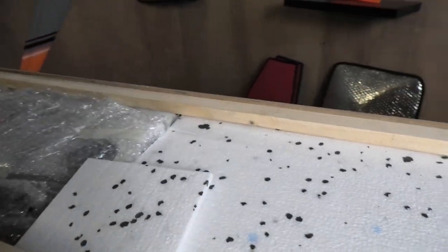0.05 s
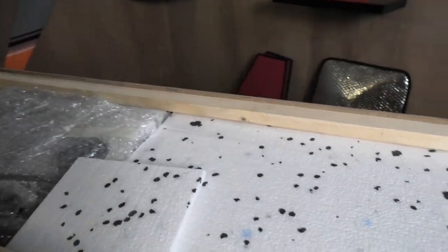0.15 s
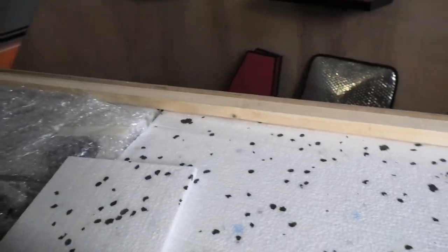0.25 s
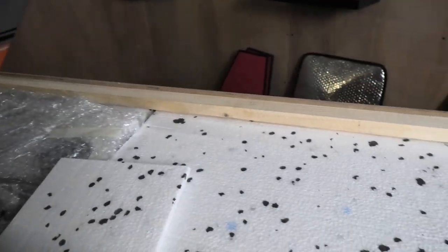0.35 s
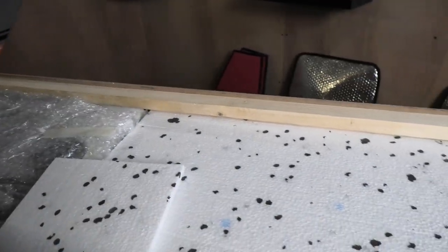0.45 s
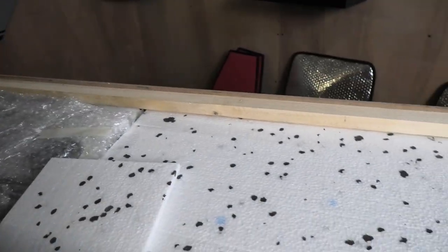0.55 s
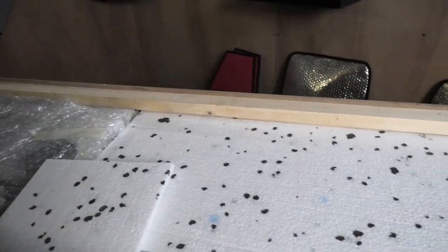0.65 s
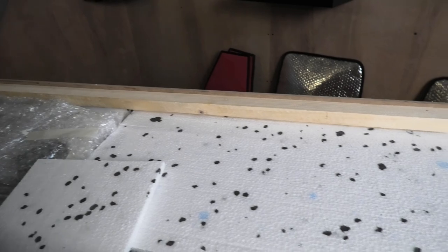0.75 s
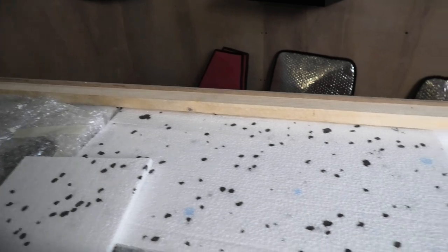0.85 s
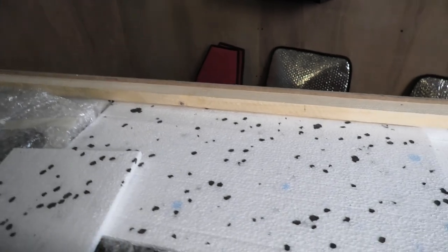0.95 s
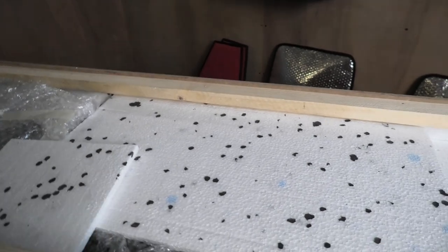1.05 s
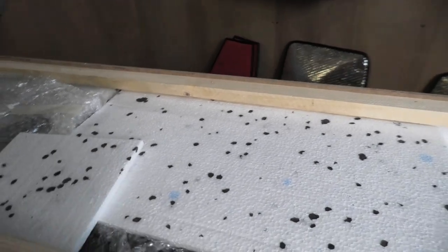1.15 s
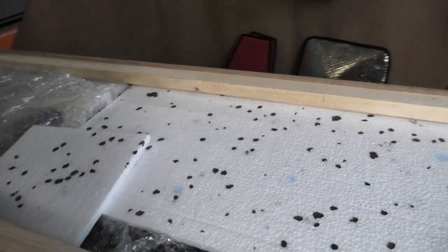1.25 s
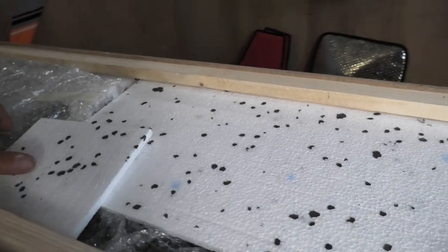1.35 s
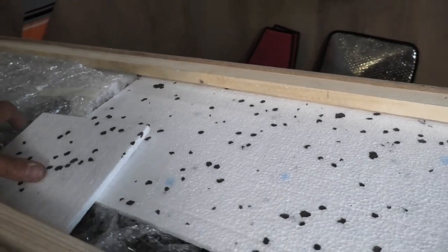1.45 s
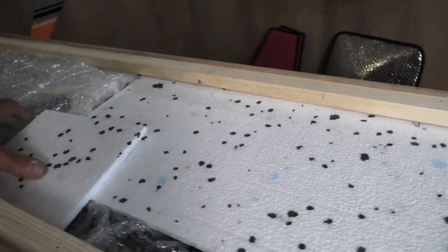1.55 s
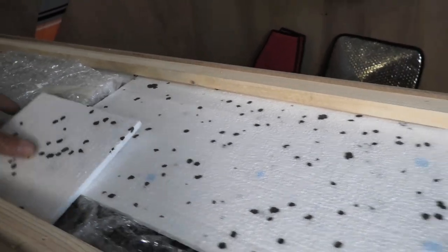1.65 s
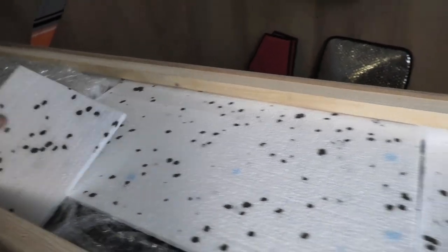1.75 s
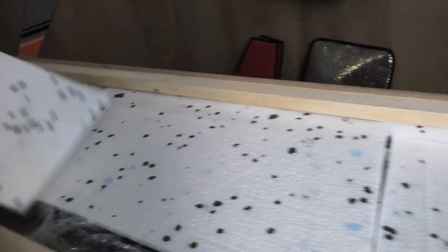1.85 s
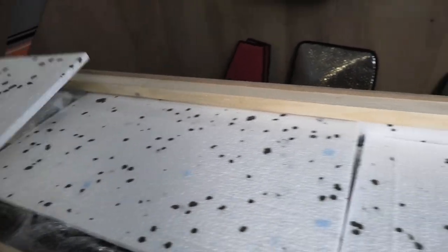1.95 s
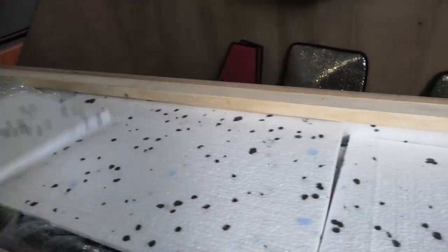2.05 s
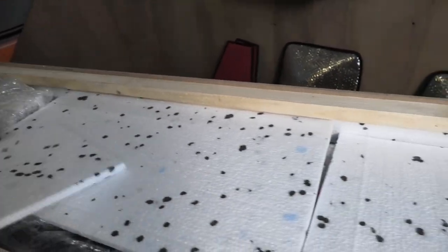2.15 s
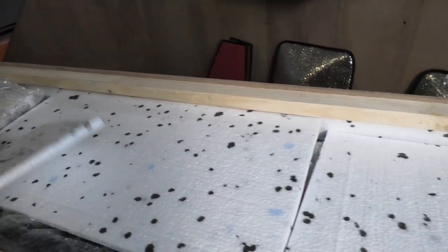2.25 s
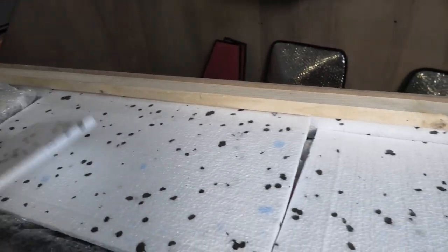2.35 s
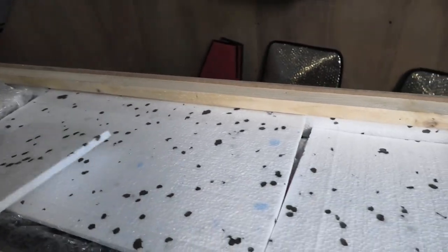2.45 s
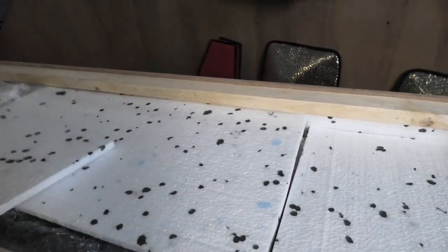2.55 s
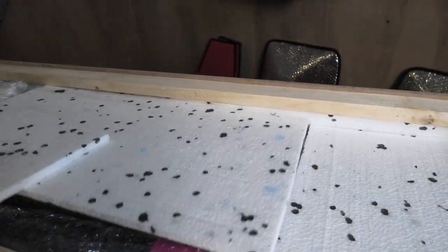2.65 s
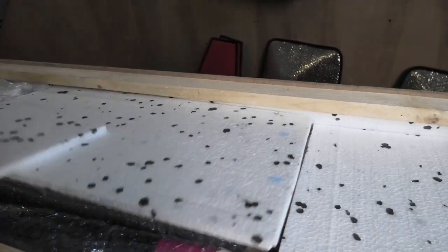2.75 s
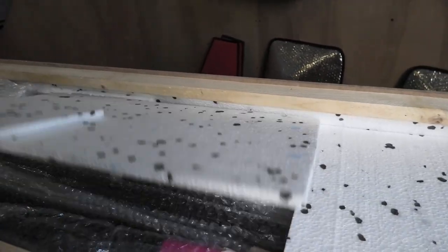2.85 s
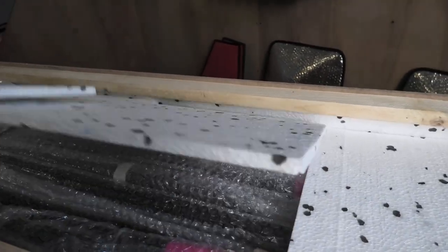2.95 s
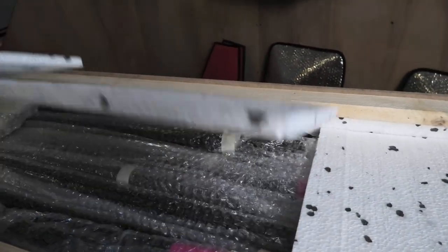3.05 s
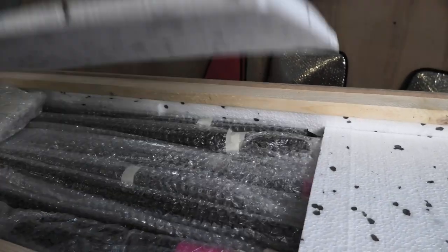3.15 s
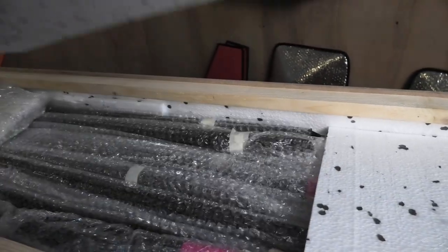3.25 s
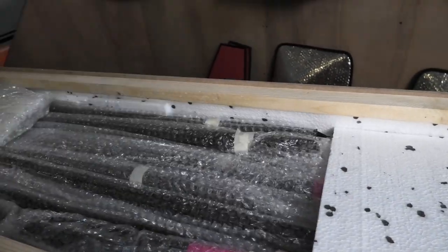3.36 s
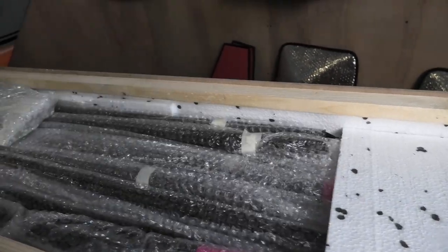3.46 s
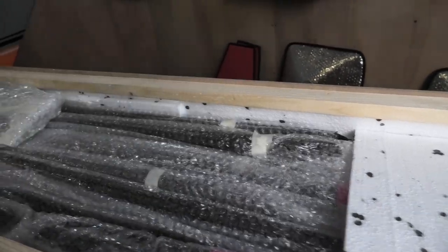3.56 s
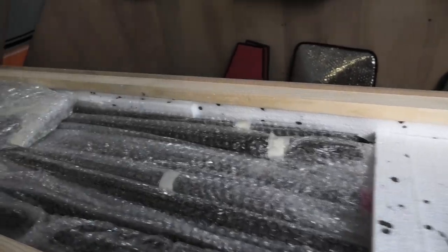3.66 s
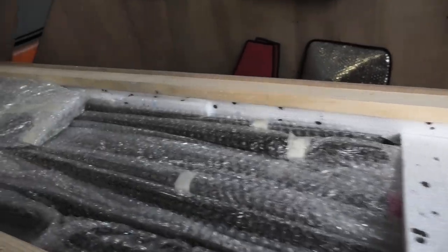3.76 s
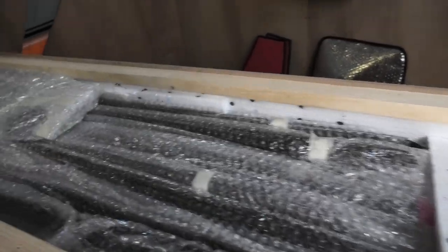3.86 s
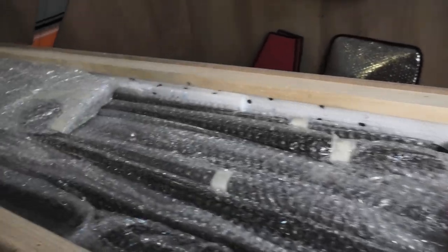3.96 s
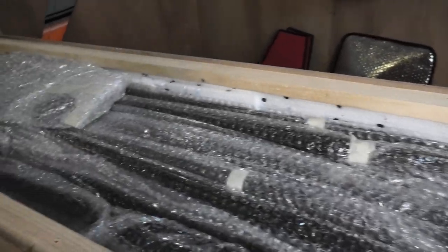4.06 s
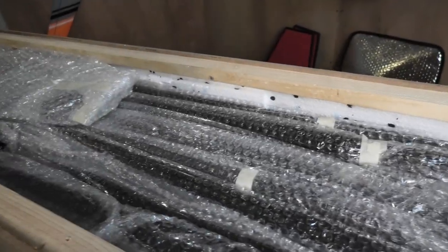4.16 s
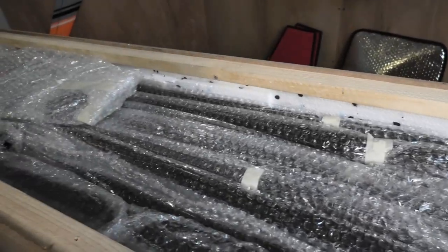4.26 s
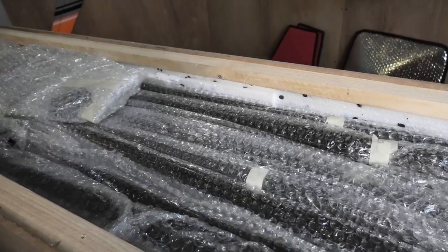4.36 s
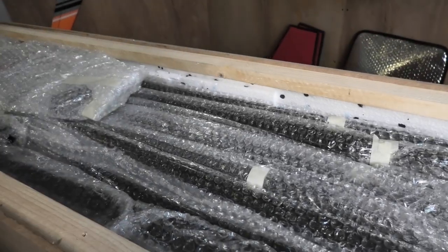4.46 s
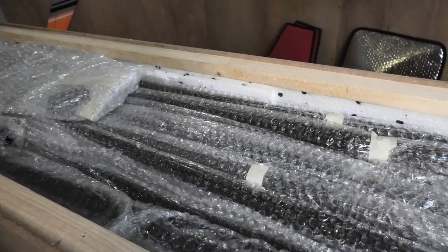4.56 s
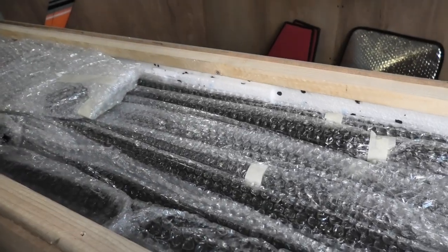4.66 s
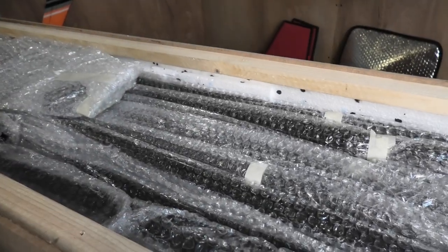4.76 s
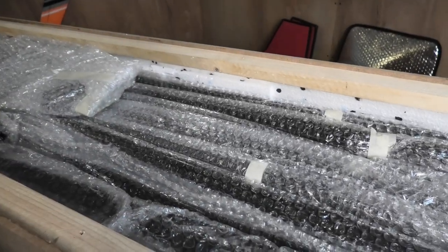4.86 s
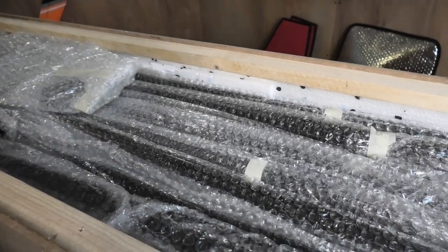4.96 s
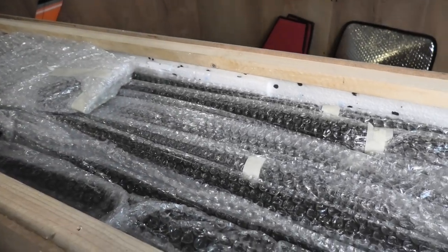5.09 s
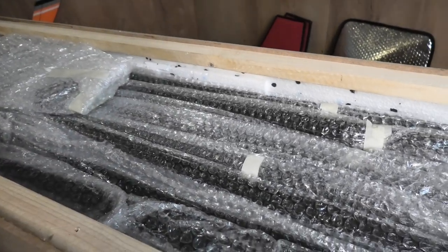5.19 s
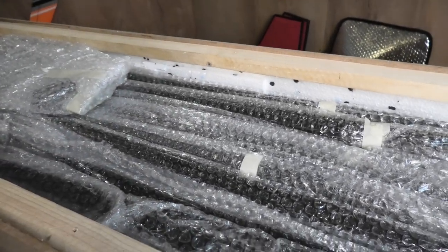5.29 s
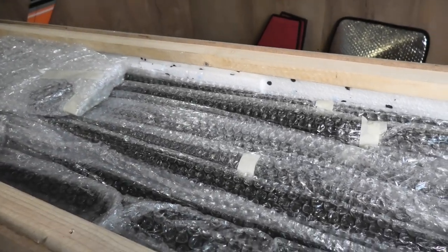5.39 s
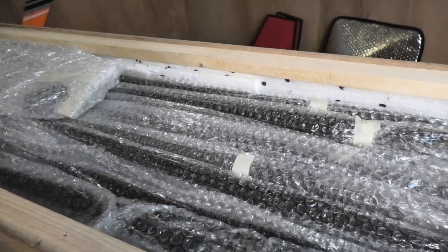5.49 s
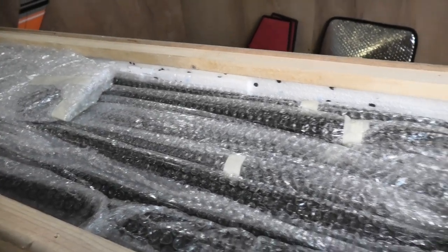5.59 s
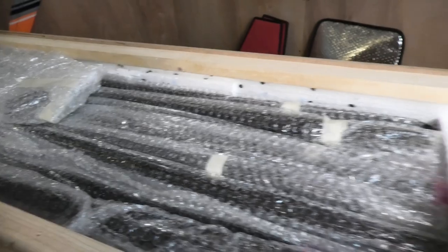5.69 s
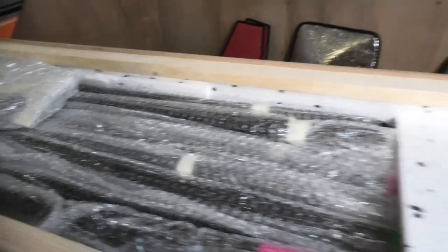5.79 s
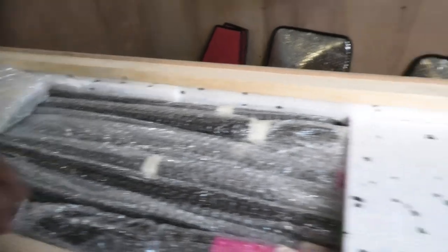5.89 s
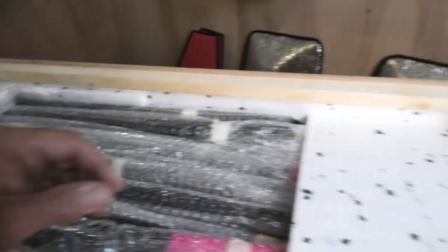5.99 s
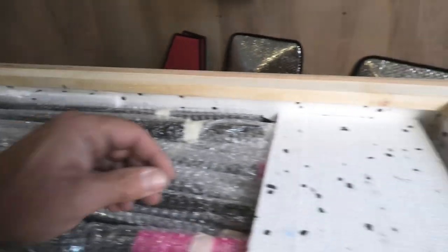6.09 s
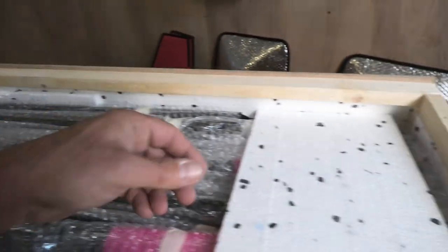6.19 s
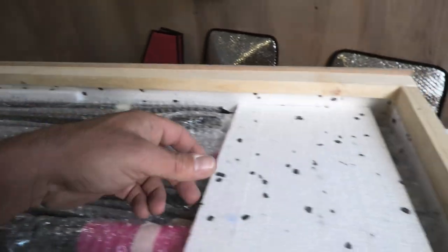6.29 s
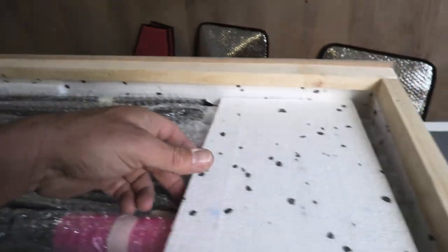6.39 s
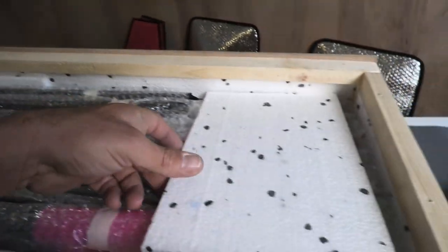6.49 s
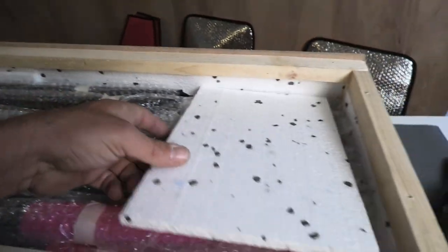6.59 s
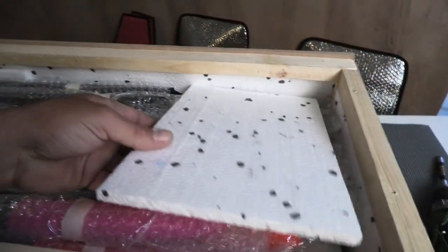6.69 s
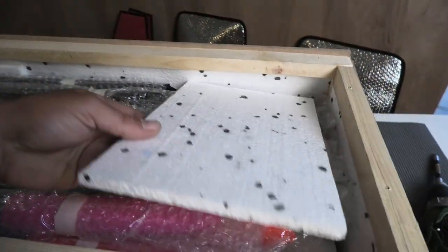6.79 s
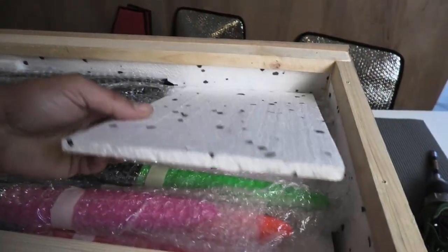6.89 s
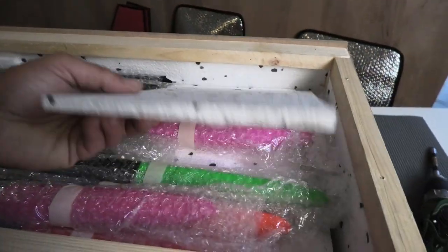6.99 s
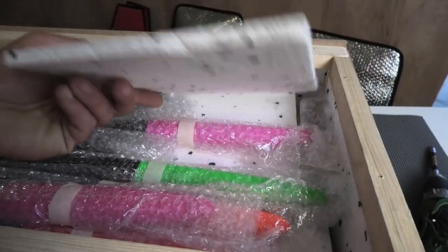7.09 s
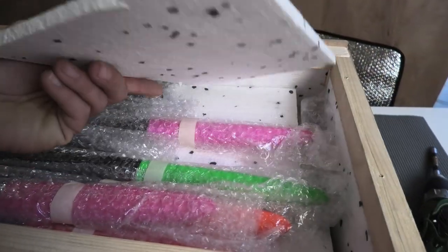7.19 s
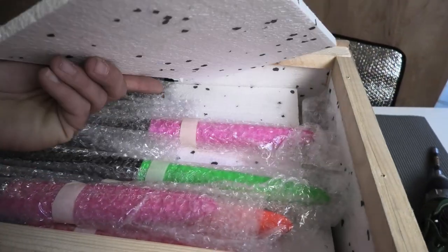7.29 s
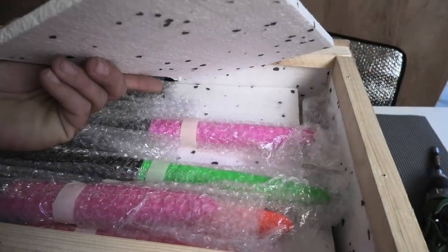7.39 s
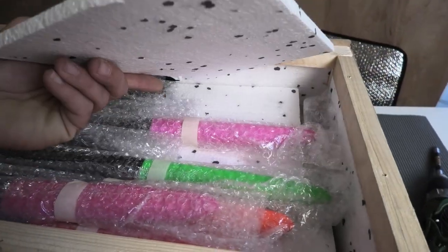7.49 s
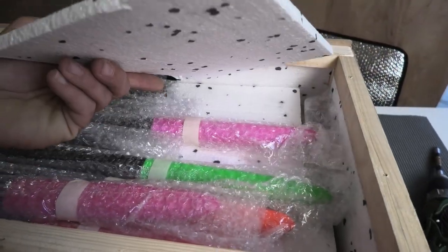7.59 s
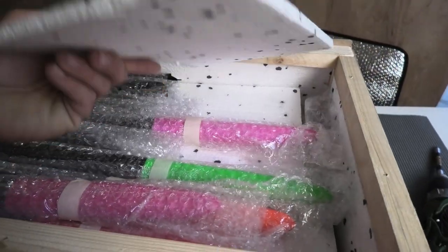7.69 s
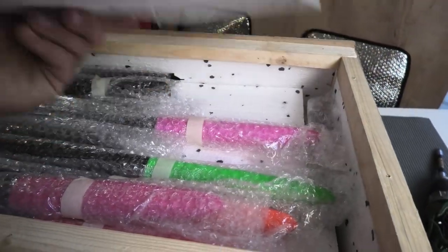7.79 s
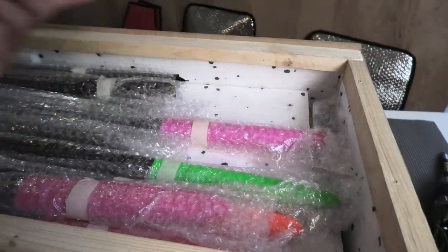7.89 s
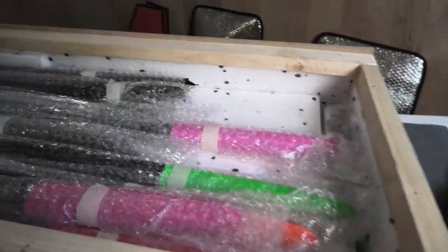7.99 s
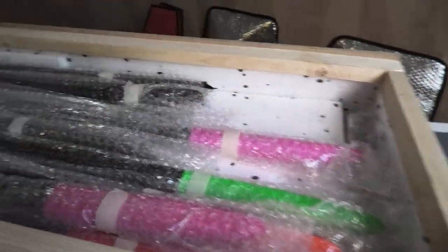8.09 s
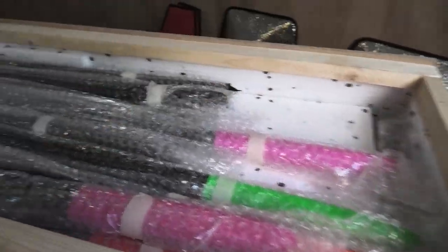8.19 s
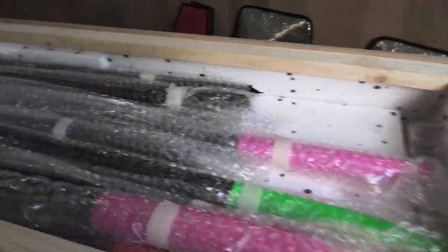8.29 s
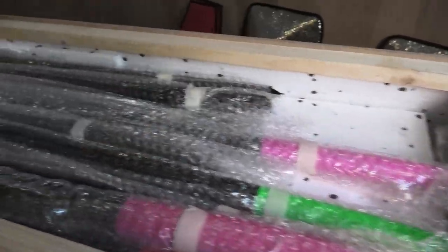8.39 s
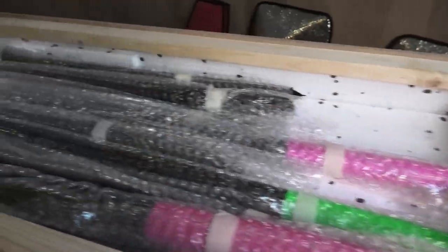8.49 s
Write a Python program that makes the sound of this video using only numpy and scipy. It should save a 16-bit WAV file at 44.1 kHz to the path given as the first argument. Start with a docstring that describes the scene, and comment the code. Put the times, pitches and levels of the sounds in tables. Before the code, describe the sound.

Light foam packing sheets scrape, squeak and crackle against each other and a wooden crate, with dull knocks and sharp snaps in a small quiet room.

```python
"""Foam sheets pulled from a crate

Polystyrene packing sheets are pulled by hand out of a wooden crate in a small room and put aside.
Their beads catch and slip thousands of times a second: random clicks, coloured by the rubbing sheet's
resonances, make a bright hiss. Snapping edges are short noise bursts; hollow thuds and crate knocks are
dying sine waves; a brief squeak is one unsteady tone. Echoes, a quiet background and a late rumble join in."""
import sys
import numpy as np
from scipy import signal
from scipy.fft import rfft, irfft
from scipy.io import wavfile

SR = 44100
rng = np.random.default_rng(int(sys.argv[2]) if len(sys.argv) > 2 else 0)


def master(y):
    """Save y as 16-bit WAV."""
    cut = np.clip(np.atleast_2d(y).T, -1, 1)
    pcm = np.round(cut * 32767)  # scale
    wavfile.write(sys.argv[1], SR, pcm.astype(np.int16))


N = 376613
TIME = np.arange(N) / SR  # seconds
FREQ = np.maximum(np.fft.rfftfreq(4096, 1 / SR), 1)  # Hz; the lowest is raised to 1 so its log exists


def undb(db):
    """Turn decibels into gain."""
    return 10 ** (np.asarray(db) / 20)


def unit(x):
    """Scale to an rms (average strength) of 1."""
    return x / np.sqrt(np.mean(x ** 2))


def contour(points):
    """Join (Hz, value) points by straight lines on a log-frequency axis."""
    hz, value = np.transpose(points)
    return np.interp(np.log(FREQ), np.log(hz), value)


def convolve(x, response):
    """Pass sound through a response, keeping its length."""
    return signal.fftconvolve(np.atleast_2d(x), np.atleast_2d(response), axes=-1)[:, :x.shape[-1]]


def colour(x, db):
    """Filter with the given dB at each of FREQ, without sounding before its input."""
    cepstrum = irfft(np.log(undb(db)))
    # folding the cepstrum forward gives the minimum-phase response
    cepstrum[1:len(FREQ) - 1] *= 2
    cepstrum[len(FREQ):] = 0
    return convolve(x, irfft(np.exp(rfft(cepstrum))))


def band(x, hz, kind):
    """Keep one range of frequencies with a Butterworth filter."""
    return signal.sosfilt(signal.butter(4, hz, kind, fs=SR, output="sos"), x)


def wander(t, rate):
    """Random drift with a spread near 1, heading for a new value `rate` times a second."""
    knots = np.arange(t[0], t[-1] + 1 / rate, 1 / rate)
    values = rng.standard_normal(len(t))[:len(knots)]
    return np.interp(t, knots, values)


def echoes(t60, delay):
    """Dense reflections of unit energy that start after a delay and fall 60 dB in t60 seconds."""
    t = TIME[:int(t60 * SR)]
    tail = rng.standard_normal(len(t)) * undb(-60 * t / t60) * (t > delay)
    return tail / np.sqrt(np.sum(tail ** 2))


# Stereo width by frequency: how much independent left-minus-right sound is added, almost none near 8 kHz.
# Each row: frequency in Hz, dB added to the source's width.
WIDTH = [(150, -5), (600, 0.5), (2000, -2), (4200, 1.5), (6200, -18.5), (8000, -48), (10000, 0.5),
         (15000, -2)]
# Left-right level difference by frequency, almost none near 5-8 kHz.
# Each row: frequency in Hz, share of the sideways position's dB (a negative share favours the far side).
PAN_SHARE = [(300, -0.39), (700, -0.032), (1300, 0.6), (2200, 0.53), (3600, 0.37), (5200, 0.063),
             (8200, 0.018), (11000, 0.4), (15000, 0.65)]
# How far the nearer side leads.
# Each row: frequency in Hz, lead in radians per dB of sideways position.
LEAD = [(200, 0), (650, .15), (1400, 0.1), (3000, 0)]


def place(source, pan_db, width_db, room_db, room_t60=0.23):
    """A second, independent take of the source adds width; the room adds a tail; panning sets the side."""
    centre, fringe = source(), source()
    first, last = np.flatnonzero(centre)[[0, -1]]
    span = slice(first, min(last + SR // 3, N))  # leaves time for the tail
    room_tone = contour([(120, 1), (600, 1.0), (2500, -3.5), (6000, -2.5), (15000, -15.0)]) + room_db

    def in_room(x):
        """Add the room's reflections, which lose their treble."""
        return x[span] + convolve(x[span], colour(echoes(room_t60, 0.0042), room_tone))

    mid = in_room(centre)
    side = colour(in_room(fringe), contour(WIDTH) + width_db)
    # left and right differ in level and, at some frequencies, in arrival
    sideways = pan_db * np.array([[.5], [-.5]])
    panning = undb(sideways * contour(PAN_SHARE)) * np.exp(1j * sideways * contour(LEAD))
    panning = np.fft.fftshift(irfft(panning), axes=1)[:, 1:]
    left_right = np.vstack([mid + side, mid - side])
    out = np.zeros((2, N))
    out[:, span] = signal.fftconvolve(left_right, panning, mode="same", axes=1)
    return out


# Tone of the quiet room. Each row: frequency in Hz, relative level in dB.
AMBIENCE = [(21, -30), (35, -12.5), (76, -8.5), (108, -9.5), (233, -14), (342, -17.5), (798, -20.5),
            (960, -16.5), (1100, -23), (1370, -20.5), (2800, -30), (3180, -32), (6690, -44), (13400, -36.5),
            (16000, -42)]


def ambience(level_db=-55, side_db=-8, swell_db=2.1):
    """Quiet room murmur and hiss from coloured noise, mostly alike left and right."""
    mid, side = (unit(colour(rng.standard_normal(N), contour(AMBIENCE))) for _ in range(2))
    level = undb(level_db + swell_db * wander(TIME, 3.63))
    return level * (mid + undb(side_db) * side * np.array([[1], [-1]]))


# A thin squeak as an edge drags.
# Each row: moment in seconds, pitch in Hz and level in dB, around which both waver.
SQUEAK = [(0.0, 1290, -61), (0.02, 1237, -34), (0.11, 1252, -45), (0.152, 1270, -37), (0.19, 1218, -52)]


def squeak(waver=.022, flutter_db=2.8):
    """For a moment the slips lock to one unsteady pitch, made as a sine wave."""
    s, hz, db = np.transpose(SQUEAK)
    pitch = np.interp(TIME, s, hz) * (1 + waver * wander(TIME, 262))
    gain = undb(np.interp(TIME, s, db) + flutter_db * wander(TIME, 55)) * (TIME < s[-1])
    return gain * np.sin(2 * np.pi * np.cumsum(pitch) / SR)


def speed_db(t, swell_db, swell_s, hold_s, release_s):
    """Sliding speed of a stroke in dB: it catches, swells to full speed, holds and runs out."""
    swell = -swell_db * np.clip(1 - t / max(swell_s, .001), 0, 1)
    run_out = -20 * np.maximum(t - swell_s - hold_s, 0) / max(release_s, .005)
    return swell + run_out


def spot_modes(low_hz=1200, high_hz=9000, db=4, q=45, count=5):
    """Power of the resonances that ring only while this spot touches, so the colour shifts."""
    centres = low_hz * (high_hz / low_hz) ** rng.random((count, 1))
    return np.sum(undb(db) ** 2 / (1 + (2 * q * (FREQ / centres - 1)) ** 2), axis=0)


# Basic tone of foam friction. Each row: frequency in Hz, relative level in dB.
FOAM = [(40, -40), (110, -4), (190, -1), (300, -5.5), (520, -6.5), (850, -1), (1200, 3.5), (2200, 4.5),
        (3000, -1), (5300, -3), (7400, 1.5), (11000, 4), (13500, 2), (16000, -4.5)]
# passes the sheet's thicket of high modes
THICKET = signal.butter(4, 2660, "high", fs=SR, output="sos")


def contact(t, modes, gap, ring_db, spread_db, slips_per_s=6000, retune=0.0081, mode_scatter_db=5.0,
            hand_damping_hz=12, fine_db=-3, fine_t60=0.034, gap_width=0.18):
    """One spot: bead slips of uneven size shake the sheet's resonances and a thicket of high modes."""
    sizes = undb(spread_db * np.minimum(rng.exponential(size=len(t)), 4.5))
    sizes = sizes * rng.choice([-1, 1], len(t))
    slips = sizes * (rng.random(len(t)) < slips_per_s / SR)
    thicket = signal.sosfilt(THICKET, echoes(fine_t60, 0))
    slips = slips + undb(fine_db) * convolve(slips, thicket)[0]
    ring = 1  # power gain, to which each resonance adds a peak
    for hz, width, db in modes:
        centre_hz = hz * (1 + retune * np.clip(rng.standard_normal(), -1, 1))
        strength = undb(db + ring_db + mode_scatter_db * rng.uniform(-0.69, 1))
        ring = ring + strength ** 2 / (1 + (2 * (FREQ - centre_hz) / (width + hand_damping_hz)) ** 2)
    gap_hz, gap_db = gap
    hollow = gap_db * np.exp(-(np.log(FREQ / gap_hz) / gap_width) ** 2)
    return colour(slips, contour(FOAM) + 10 * np.log10(ring + spot_modes()) + hollow)[0]


# Faster sliding is louder, and brighter because hiss gains most. One row each for hiss, rasp and flexing.
# Each row: dB gained per dB of speed, radiation in dB added to the stroke's level.
SPEED_LAW = [(1, 0), (0.94, -1.3), (0.44, -1.5)]
BREAK_S = .003  # time a stroke takes to break loose
# filters that part the bead hiss, the sheet's rasp and its low flexing
HISS = signal.butter(4, 4000, "high", fs=SR, output="sos")
RASP = signal.butter(4, [500, 4000], "band", fs=SR, output="sos")
FLEX = signal.butter(4, 500, "low", fs=SR, output="sos")


def rub(stroke, modes, gap, ring_db, spread_db, top_db, judder_db=1.5, judder_hz=170,
        own_db=1.08, own_hz=35, roll_s=.09):
    """One stroke: contact rolls from spot to spot, slips bunch, speed sets level and brightness."""
    start, swell_db, swell_s, hold_s, release_s, *levels = stroke
    end = start + swell_s + hold_s + 2 * release_s + .01
    inside = slice(*np.searchsorted(TIME, [start - BREAK_S / 2, end]))
    t = TIME[inside] - start
    sheet = np.zeros(len(t))
    for moment in np.arange(0, t[-1] + roll_s, roll_s):
        near = np.abs(t - moment) < roll_s
        if near.any():
            fade = np.cos(np.pi / 2 * (t[near] - moment) / roll_s)  # neighbouring spots overlap
            sheet[near] += fade * contact(t[near], modes, gap, ring_db, spread_db)
    bunched = sheet * undb(judder_db * wander(t, judder_hz))
    sheet = colour(bunched, top_db * contour([(7000, 0.22), (14000, 0.78)]))[0]
    parts = [signal.sosfilt(part, sheet) for part in (HISS, RASP, FLEX)]
    speed = speed_db(t, swell_db, swell_s, hold_s, release_s)
    loose = np.clip(t / BREAK_S + .5, 0, 1)
    out = np.zeros(N)
    for part, db, (slope, radiation_db) in zip(parts, levels, SPEED_LAW):
        level_db = db + radiation_db + slope * speed + own_db * wander(t, own_hz)  # each part also drifts
        out[inside] += unit(part) * loose * undb(level_db)
    return out


# Resonances of the sheet as it is held in each movement; pitch and strength vary a little per spot.
# Each row: pitch in Hz, width in Hz before the hand's damping widens it, relative strength in dB.
NUDGE_MODES = [(1400, 270, -1.5), (1880, 50, 0), (2650, 220, -2)]
SHOVE_MODES = [(637, 33, 4.5), (1460, 160, 3), (1770, 60, 0), (2210, 50, -1), (2350, 43, -4),
               (2730, 100, -2)]
GRAB_MODES = [(617, 210, 9), (1900, 250, -1), (2520, 250, -9)]
PULL_MODES = [(813, 110, -2), (3470, 130, 3)]
SMALL_MODES = [(825, 56, -2), (1460, 41, 2.5), (1940, 160, 0.5), (2430, 67, 0)]
LARGE_MODES = [(742, 90, 4), (1054, 120, -0.5), (1680, 230, -0.5), (1960, 40, -3), (2290, 43, -0.5)]
CLEAR_MODES = [(765, 210, 3.5), (1200, 230, -3), (1830, 124, -3.5), (2370, 70, -1.5)]
STACK_MODES = [(1180, 140, -4.5), (1750, 52, -6), (2280, 87, -8), (3290, 74, -3), (3800, 80, -5.5)]
SLIDE_MODES = [(643, 56, 11), (1065, 33, 8), (1207, 24, 10), (1460, 58, 3), (2000, 600, -2.5),
               (2730, 60, 1), (3500, 350, -7)]
PRISE_MODES = [(675, 280, 17), (1050, 240, 8.5), (2180, 25, 19.6), (2290, 60, 8), (3240, 300, 2)]
LAST_MODES = [(650, 25, 3), (1115, 150, 3.5), (2280, 120, -1), (3170, 80, 0), (3930, 52, -0.5),
              (7750, 400, -9)]
TILT_MODES = [(1100, 63, -2), (1700, 88, 4), (2250, 140, -8), (3200, 270, -18)]
JERK_MODES = [(1130, 110, 3.5), (1370, 170, 1), (2840, 200, -0.5), (4350, 120, -5), (7200, 270, 2)]
SKID_MODES = [(1100, 81, -7), (7130, 220, 9), (12600, 2800, 2)]
DROP_MODES = [(676, 250, 2), (1850, 120, -3), (2280, 150, -5), (11400, 1500, -2)]
CARRY_MODES = [(1110, 51, -7.5), (1713, 75, -.5), (2220, 77, -6), (3280, 250, -10)]
# How the sheet is held from each moment on.
# Each row: start in seconds, resonances, their added strength in dB, centre in Hz of the gap between
# resonances, gain in dB there (negative is a dip), spread of slip sizes in dB, treble tilt in dB
# (about a fifth of it low down, most of it in the top octave), sideways position in dB (positive is
# left), width in dB, room echo in dB.
MOVES = [ (0, NUDGE_MODES, 8, 950, -1.5, 2, 0, 8, -3.5, -4),
         (.18, SHOVE_MODES, 4.5, 830, -3, 1.5, -4.5, 8, -3, -7),
         (1.3, GRAB_MODES, -3, 1250, 3.5, 5, -1, 4, -7, -24),
         (1.62, PULL_MODES, 7.5, 1250, 2.5, 2, 4.5, 6.5, -8.5, -14),
         (1.7, SMALL_MODES, 4.5, 1250, -3, 1.7, -1.3, 8, -5.5, -6),
         (2.18, LARGE_MODES, 5, 920, -4.5, 2, -3, 6.5, -7.5, -10.5),
         (2.98, CLEAR_MODES, 5, 1450, 0.5, 1.5, 0, 4.5, -4.5, -11.5),
         (3.3, STACK_MODES, 9.5, 950, 2, 3.5, 2, 7.5, -5.5, -8),
         (4.2, SLIDE_MODES, -1.5, 890, -3.5, 2, -2, 9, -4.5, -7.5),
         (6.3, PRISE_MODES, -17, 1930, 3.5, 4, -2.5, -2, -9, -21),
         (6.9, LAST_MODES, 5, 1380, -1.5, 3, 4, 0.5, -10, -10.5),
         (7.11, TILT_MODES, 14, 1400, -1, 0.5, -1, 4, -7, -11.5),
         (7.55, JERK_MODES, 5, 750, -3.5, 2, 1, 0, -11, -15),
         (7.79, SKID_MODES, 5, 720, -11.5, 2, 5, 1, -13, -5),
         (7.84, DROP_MODES, 6.5, 1290, -1, 1.5, 3, 6, -7.5, -9),
         (7.94, CARRY_MODES, 17, 1370, -6, 3.5, -3.5, 7, -3.5, -9)]
# Strokes of foam over foam or wood.
# Each row: start in seconds, how far below full speed it catches in dB, swell in seconds, hold in
# seconds, release in seconds to fall 20 dB, then levels in dB of bead hiss, sheet rasp and low flexing
# at full speed, before radiation and drift.
STROKES = [(0.003, 15.0, 0.017, 0.011, 0.295, -40.5, -38.0, -53.0),
           (0.189, 8.0, 0.175, 0.05, 0.119, -35.5, -35.5, -44.0),
           (1.416, 17.0, 0.151, 0.009, 0.021, -48.5, -48.5, -54.5),
           (1.515, 9.0, 0.014, 0.011, 0.038, -39.0, -37.5, -45.0),
           (1.562, 7.0, 0.032, 0.036, 0.127, -46.0, -46.0, -55.0),
           (1.661, 11.0, 0.009, 0.087, 0.13, -30.5, -33.0, -44.0),
           (1.747, 18.0, 0.045, 0.07, 0.065, -24.5, -29.0, -44.5),
           (1.942, 11.0, 0.049, 0.028, 0.051, -32.5, -40.5, -57.0),
           (2.055, 11.0, 0.012, 0.031, 0.051, -38.5, -44.5, -58.0),
           (2.213, 7.0, 0.005, 0.074, 0.219, -33.0, -32.5, -40.5),
           (2.318, 10.0, 0.069, 0.007, 0.084, -29.5, -35.0, -52.0),
           (2.436, 8.0, 0.022, 0.032, 0.098, -31.5, -36.0, -50.5),
           (2.574, 10.0, 0.021, 0.01, 0.09, -29.5, -31.0, -43.5),
           (2.639, 15.0, 0.058, 0.046, 0.043, -27.5, -29.0, -46.0),
           (2.788, 6.0, 0.003, 0.04, 0.03, -31.5, -32.5, -50.0),
           (2.818, 13.0, 0.005, 0.064, 0.061, -24.0, -29.0, -52.5),
           (2.928, 6.0, 0.035, 0.011, 0.051, -36.0, -38.0, -51.0),
           (2.996, 10.0, 0.038, 0.015, 0.054, -26.5, -32.0, -52.5),
           (3.098, 11.0, 0.006, 0.017, 0.031, -37.5, -43.5, -54.5),
           (3.12, 10.0, 0.013, 0.014, 0.061, -23.5, -30.5, -53.0),
           (3.257, 11.0, 0.005, 0.01, 0.065, -49.5, -57.0, -66.0),
           (3.383, 6.0, 0.003, 0.006, 0.035, -34.5, -42.0, -53.0),
           (3.426, 4.0, 0.002, 0.003, 0.035, -35, -34.5, -45),
           (3.475, 6.0, 0.003, 0.009, 0.33, -40.0, -43.5, -56.0),
           (3.524, 13.0, 0.014, 0.025, 0.045, -27.0, -34.0, -52.0),
           (3.679, 17.0, 0.009, 0.026, 0.181, -32.0, -35.5, -52.5),
           (3.74, 14.0, 0.027, 0.018, 0.067, -27.5, -40.0, -53.5),
           (3.926, 12.0, 0.007, 0.008, 0.179, -41.0, -47.0, -57.5),
           (4.048, 24.0, 0.032, 0.006, 0.099, -32.0, -38.0, -50.5),
           (4.211, 13.0, 0.008, 0.006, 0.12, -48.0, -47.5, -61.0),
           (4.348, 12.0, 0.005, 0.119, 0.199, -54.5, -54.5, -61.5),
           (4.529, 11.0, 0.004, 0.008, 0.1, -27.0, -28.5, -42.5),
           (4.623, 8.0, 0.038, 0.012, 0.079, -32.5, -36.0, -46.5),
           (4.693, 7.0, 0.067, 0.208, 0.183, -35.5, -37.5, -54.5),
           (4.99, 13.0, 0.038, 0.093, 0.127, -31.0, -36.5, -49.0),
           (6.391, 9.0, 0.018, 0.005, 0.036, -35.0, -35.0, -47.0),
           (6.453, 13.0, 0.007, 0.006, 0.048, -41.5, -46.5, -58.5),
           (6.497, 11.0, 0.011, 0.089, 0.08, -51.5, -52.0, -61.5),
           (6.584, 12.0, 0.009, 0.006, 0.026, -46.5, -45.5, -58.5),
           (6.618, 16.0, 0.004, 0.004, 0.058, -37.5, -38.0, -40.5),
           (6.659, 13.0, 0.029, 0.136, 0.183, -38.5, -42.0, -55.0),
           (6.741, 11.0, 0.12, 0.072, 0.023, -31.5, -34.5, -51.0),
           (7.008, 14.0, 0.011, 0.07, 0.131, -29.0, -32.0, -52.5),
           (7.054, 14.0, 0.03, 0.072, 0.008, -25.5, -32.5, -57.0),
           (7.157, 11.0, 0.031, 0.026, 0.036, -30.5, -36.0, -49.0),
           (7.317, 13.0, 0.007, 0.004, 0.025, -51.5, -48.5, -53.0),
           (7.358, 15.0, 0.006, 0.005, 0.022, -40.5, -43.0, -59.5),
           (7.68, 14.0, 0.014, 0.013, 0.026, -53.5, -49.5, -61.0),
           (7.75, 10.0, 0.035, 0.009, 0.01, -21.5, -25.5, -39.0),
           (7.797, 9.0, 0.042, 0.008, 0.014, -20.0, -32.5, -47.0),
           (7.846, 3.0, 0.003, 0.003, 0.035, -35.5, -35, -45),
           (7.878, 6.0, 0.003, 0.006, 0.03, -36, -36.5, -44),
           (7.895, 9.0, 0.035, 0.02, 0.029, -33.5, -44.0, -50.5),
           (7.974, 13.0, 0.01, 0.006, 0.113, -51.0, -46.5, -55.0),
           (8.034, 16.0, 0.043, 0.006, 0.071, -33.0, -34.5, -54.5),
           (8.115, 8.0, 0.041, 0.056, 0.061, -36.5, -39.5, -55.5),
           (8.284, 10.0, 0.039, 0.022, 0.095, -38.0, -42.5, -56.5),
           (8.418, 12.0, 0.012, 0.013, 0.135, -49.0, -51.0, -56.5),
           (8.506, 15.0, 0.023, 0.01, 0.05, -42.0, -46.5, -58.5)]


def movements():
    """Hands move the sheets: each way of holding gives its strokes their resonances and place."""
    out = np.zeros((2, N))
    ends = [move[0] for move in MOVES[1:]] + [np.inf]
    for move, end in zip(MOVES, ends):
        begin, modes, ring_db, gap_hz, gap_db, spread_db, top_db, pan_db, width_db, room_db = move
        strokes = [stroke for stroke in STROKES if begin <= stroke[0] < end]

        def rubbing():
            """All the strokes of this movement."""
            return sum(rub(stroke, modes, (gap_hz, gap_db), ring_db, spread_db, top_db)
                       for stroke in strokes)

        out += place(rubbing, pan_db, width_db, room_db)
    return out


# Sheets bumping.
# Each row: start in seconds, peak in dB before the shared trim, pitch in Hz, time in seconds to fall 60 dB.
BUMPS = [(0.328, -29.5, 165, 0.097), (0.404, -26, 318, 0.1), (0.469, -29.5, 190, 0.1),
         (1.527, -31.5, 165, 0.069), (2.228, -25, 192, 0.15), (2.249, -26.5, 204, 0.25),
         (2.407, -30.5, 124, 0.084), (2.608, -28.5, 145, 0.081), (2.734, -27, 172, 0.086),
         (2.857, -34, 175, 0.092), (4.528, -36.5, 280, 0.12), (5.055, -40, 187, 0.079),
         (5.2, -40, 170, 0.07), (6.619, -26.5, 177, 0.09), (7.748, -26.5, 110.5, 0.15),
         (7.845, -22.5, 111, 0.077), (7.879, -28.5, 138, 0.068), (7.909, -33, 73.4, 0.098)]
# Bending modes of a bumped sheet.
# Each row: multiple of the bump's pitch, relative level in dB, share of the bump's decay time.
BEND = [(0.999, 4.5, 0.76), (1.42, -4, 0.72), (2.1, -10.5, 0.51), (3.3, -8, 0.11)]


def bumps(bump_db=-2, push_s=0.0085):
    """A soft push sets the light sheet bending in a few quickly damped modes."""
    out = np.zeros(N + SR)
    t = TIME[:SR // 3]
    for s, db, hz, t60 in BUMPS:
        thud = np.zeros(len(t))
        for ratio, mode_db, share in BEND:
            decay = undb(mode_db - 60 * t / (t60 * share))
            thud += decay * np.sin(2 * np.pi * (hz * ratio * t + rng.random()))
        thud *= 1 - np.exp(-t / push_s)
        start = int(s * SR)
        out[start:start + len(t)] += undb(db + bump_db) * thud / np.abs(thud).max()
    return out[:N]


# A sheet knocking on the crate. Each row: start in seconds, peak in dB before it is placed in the room.
KNOCKS = [(0.331, -38), (0.407, -37), (1.5179, -20), (1.742, -17.5), (1.818, -15.5), (2.2313, -19.5),
          (2.2508, -10.5), (2.269, -20), (3.3814, -33), (3.427, -28), (3.474, -26), (4.53, -26),
          (6.39, -28.5), (6.537, -41), (7.75, -21.5), (7.849, -31), (7.882, -33)]
# Modes of the knocked crate, whose pitches vary a little from knock to knock.
# Each row: pitch in Hz, relative level in dB, time in seconds to fall 60 dB.
CRATE = [(420, -4.5, 0.097), (564, 1, 0.033), (726, 5.5, 0.022), (962, 7.5, 0.016), (1350, -4.5, 0.021),
         (2820, 0, 0.0052)]


def knocks():
    """A sheet's edge strikes the boards, which ring very briefly and radiate little bass."""
    out = np.zeros(N + SR)
    t = TIME[:SR // 8]
    for s, db in KNOCKS:
        knock = np.zeros(len(t))
        for hz, mode_db, t60 in CRATE:
            mode_hz = hz * (1 + 0.05 * rng.standard_normal())
            knock += undb(mode_db - 60 * t / t60) * np.cos(2 * np.pi * mode_hz * t)
        knock *= 1 - np.exp(-t / 0.00053)  # foam is a soft hammer
        start = int(s * SR)
        out[start:start + len(t)] += undb(db) * knock / np.abs(knock).max()
    return out[:N]


# Edges snapping free.
# Each row: start in seconds, peak in dB before the shared trim, weight of the low-mids in dB,
# time in seconds for the crack to fall 60 dB.
SNAPS = [(2.2123, -6, -22, 0.014), (2.8224, -9, -5, 0.0097), (3.131, -14, -13, 0.013),
         (3.263, -23, -26, 0.0048), (3.382, -7.5, -7, 0.004), (3.3875, -27, -23, 0.0068),
         (3.4265, -18.5, -1, 0.0073), (3.4753, -9.5, -8, 0.0048), (3.559, -12, -20, 0.0087),
         (3.686, -12, -28, 0.011), (3.931, -24, -19, 0.014), (4.078, -15.5, -15, 0.013),
         (4.355, -33, -20, 0.012), (4.532, -15, -19, 0.018), (6.623, -23, 0, .015),
         (6.704, -13, -19, 0.013), (6.853, -19.5, -26, .015), (7.416, -32, -22, 0.011),
         (7.793, -22, -18, 0.0062), (7.838, -13, -26, .007), (7.8445, -8.5, -28, 0.007)]
# Tone of a snap before that weight. Each row: frequency in Hz, relative level in dB.
SNAP_COLOUR = [(120, -14), (200, -12.5), (709, -18), (1400, 4), (3070, -6.5), (8120, 1.5), (9580, 0),
               (14300, -3.5), (16000, 3)]


def snaps(snap_db=-1, crumble_db=-15, crumble_stretch=5):
    """An edge lets go with a sharp crack of noise; a fainter, slower decay is beads crumbling."""
    out = np.zeros(N + SR)
    t = TIME[:SR // 5]
    for s, db, body_db, t60 in SNAPS:
        fall_db = -60 * t / max(t60, .002)
        crumble = undb(crumble_db + fall_db / crumble_stretch)
        burst = rng.standard_normal(len(t)) * (undb(fall_db) + crumble)
        body = (body_db + 12.5) * contour([(2000, 0.8), (5000, 0.56)])
        crack = colour(burst, contour(SNAP_COLOUR) + body)[0]
        start = int(s * SR)
        out[start:start + len(t)] += undb(db + snap_db) * crack / np.abs(crack).max()
    return out[:N]


# Deep handling rumble that swells as the last sheet comes out. Each row: moment in seconds, level in dB.
RUMBLE = [(5.3, -86.5), (6.2, -64), (7.7, -58.5), (7.88, -52), (8.02, -54), (8.12, -77.5)]


def rumble(low_hz=35, high_hz=95):
    """Handling shakes the recorder a little: low noise that rises and falls."""
    s, db = np.transpose(RUMBLE)
    shaking = unit(band(rng.standard_normal(N), [low_hz, high_hz], "band"))
    return shaking * undb(np.interp(TIME, s, db))


def scene():
    """Every movement from its own place, with the squeak, bumps, knocks and snaps that go with it."""
    out = ambience() + rumble()
    out += place(squeak, pan_db=5, width_db=-7, room_db=-13)
    out += movements()
    out += place(lambda: bumps() + knocks(), pan_db=6.5, width_db=-17.0, room_db=-13.0)
    return out + place(snaps, pan_db=12, width_db=-8.0, room_db=-11.5)


def record(dry):
    """The recorder cuts the very top, above 15950 Hz."""
    return signal.sosfilt(signal.ellip(10, .2, 70, 15950, fs=SR, output="sos"), dry)


dry = scene()
out = record(dry)
master(out)
```